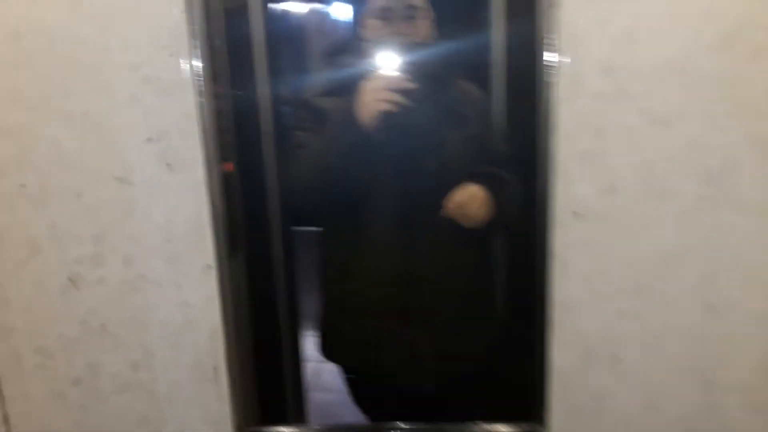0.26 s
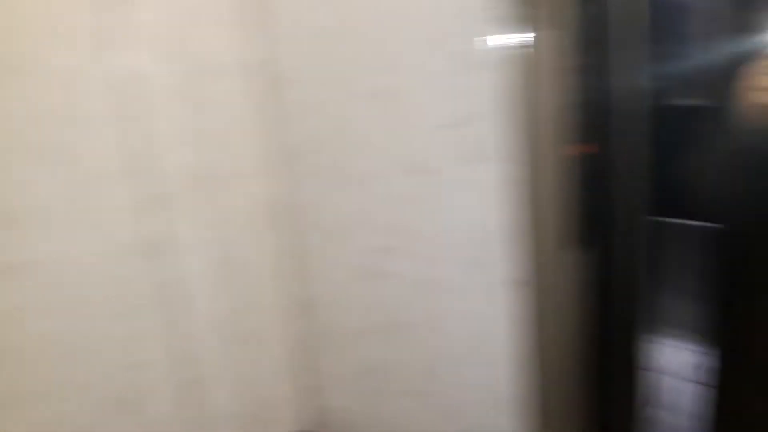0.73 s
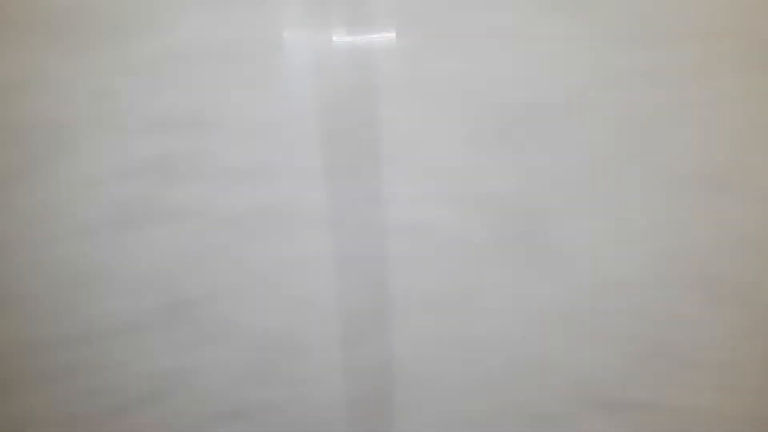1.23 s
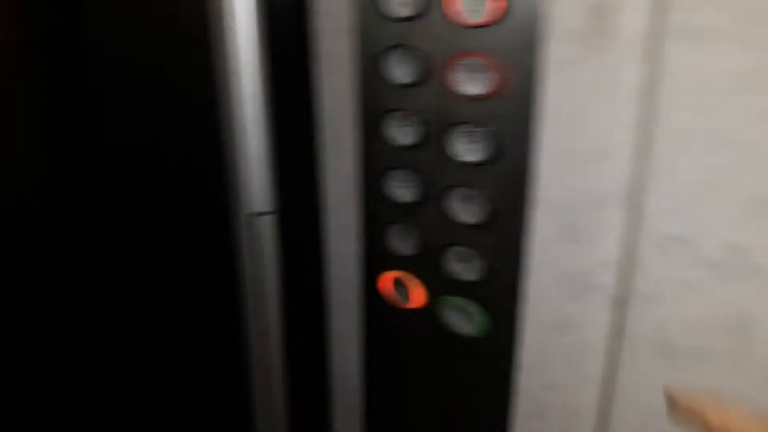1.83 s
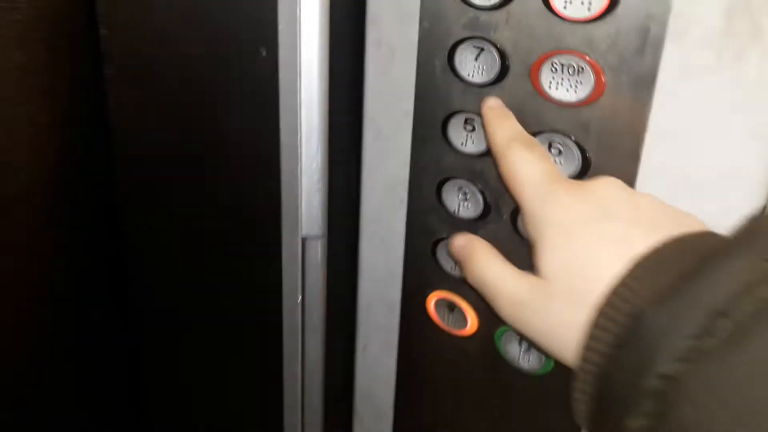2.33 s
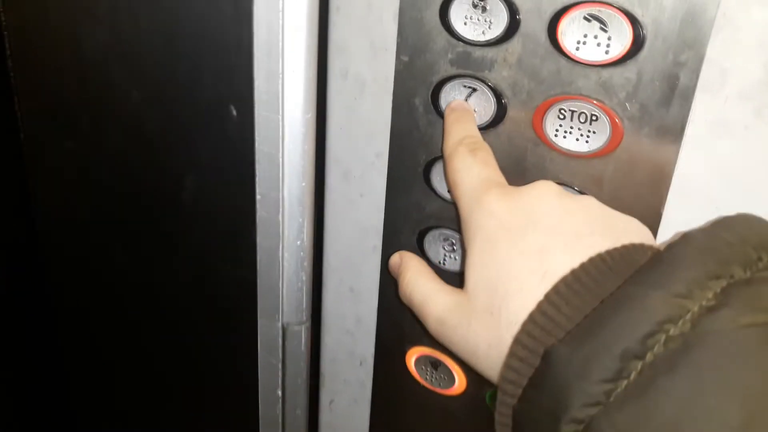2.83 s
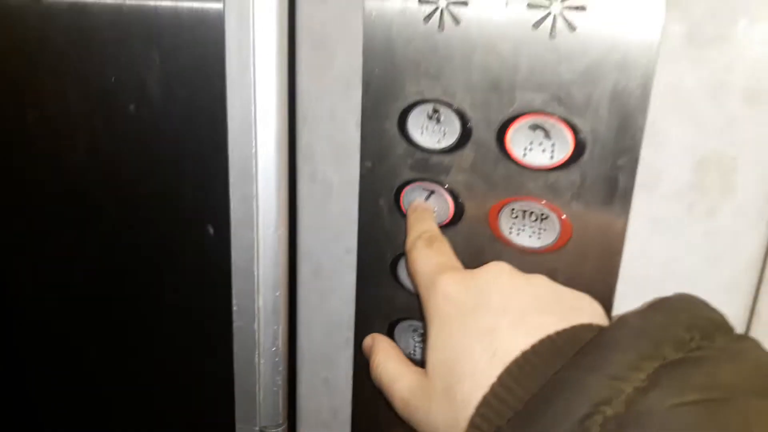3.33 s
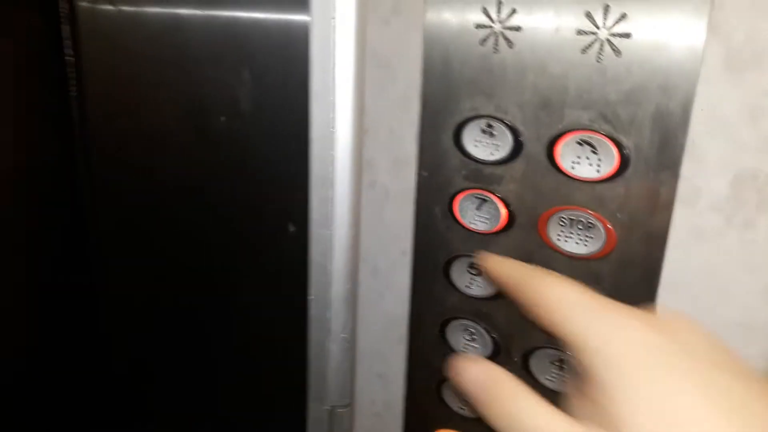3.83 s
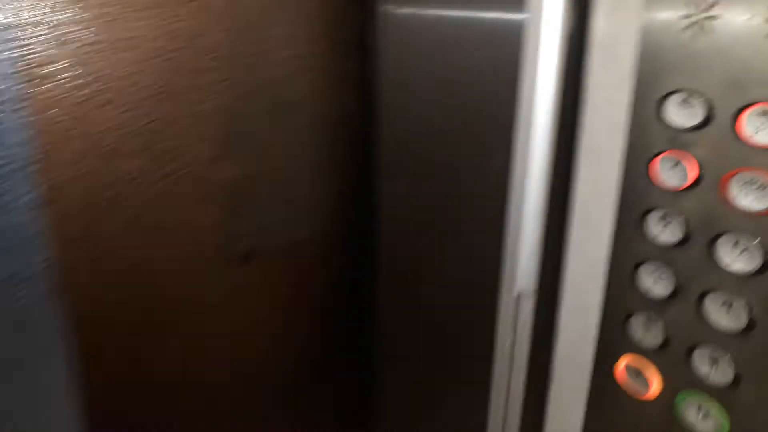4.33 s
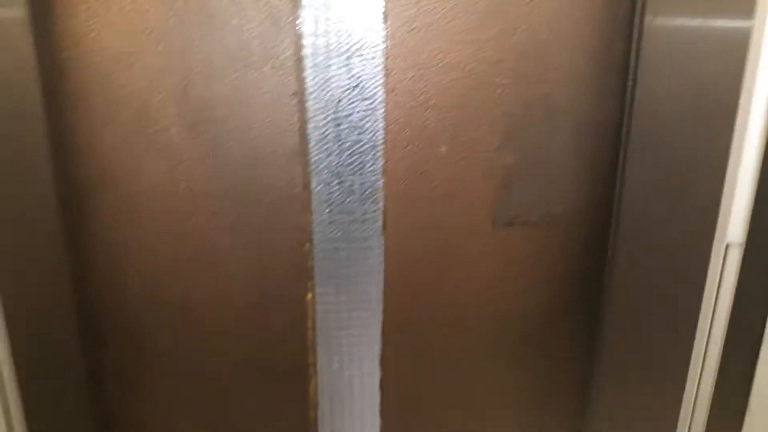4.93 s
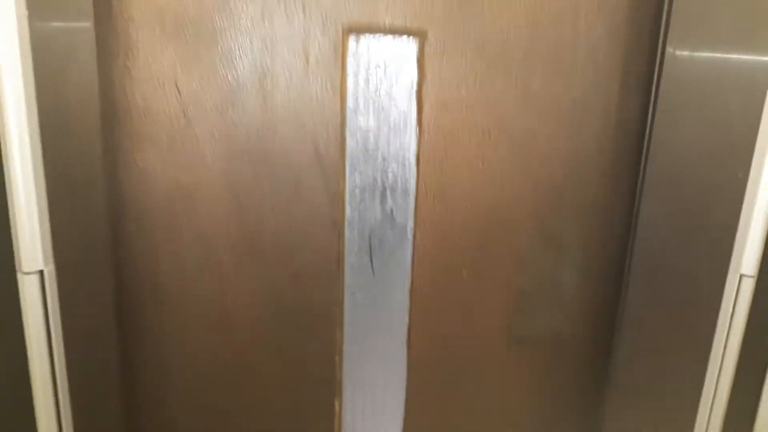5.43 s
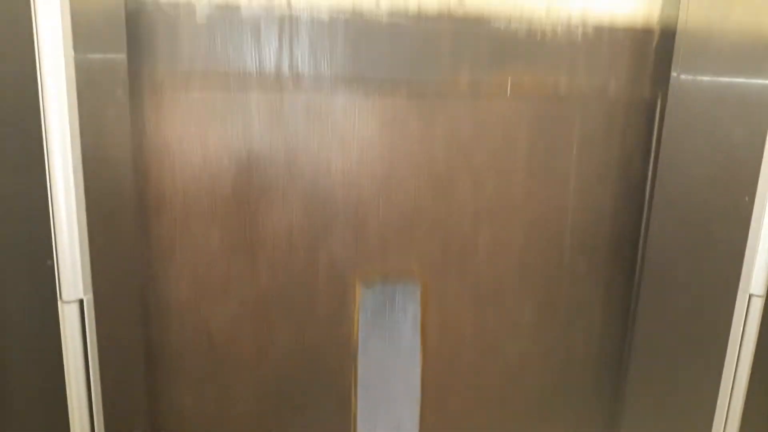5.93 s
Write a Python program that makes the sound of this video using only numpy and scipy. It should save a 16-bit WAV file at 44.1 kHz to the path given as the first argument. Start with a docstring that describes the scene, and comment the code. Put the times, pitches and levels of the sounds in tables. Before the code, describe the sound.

A close handheld mono microphone inside a small, boxy steel lift. For the first 1.4 seconds there is only quiet: soft coat rustle, muffled foot shifts on a hollow floor, and light taps near 0.3 and 0.7. From 1.4 to 2.3 a loose steel door bangs and rattles in its frame, an uneven cluster of hard knocks, strongest around 1.5 to 1.8, with another group near 1.95 and weaker thuds after, ringing briefly. The ring dies into near silence. Around 2.9 to 3.2 a fingertip creaks in tiny ticks; a faint springy click comes at 3.35, a sharper, louder snap at 3.65, and a dry tick at 4.06. At 4.44 to 4.56 the sliding doors meet with a metallic clash and a deep, round boom that decays. From 4.9 to the end near 6 a faint low rumble and wavering motor hum run under small sleeve rustles.

```python
'''Inside a small lift: the steel landing door bangs and rattles in its frame, then a floor button clicks.
The sliding car doors meet with a clash and a boom, and the drive hums. A coat rustles, feet shift.
Struck steel is enveloped noise bands plus ringing modes; booms are swelling sines; fittings and the
button spring are clusters of close modes. Coat, floor, air and ride are coloured noise; hum is wavering sines.'''
import sys
import numpy as np
from scipy import signal
from scipy.fft import rfft, irfft
from scipy.io import wavfile

SR = 44100
rng = np.random.default_rng(int(sys.argv[2]) if len(sys.argv) > 2 else 0)


def dump_mix(stems):
    """Bounce the given channels to the path in sys.argv[1] as a 16-bit WAV at rate SR."""
    frames = np.atleast_2d(stems).T  # one column per channel
    limited = np.clip(frames, -1, 1)  # hard clip at full scale
    pcm = np.round(limited * 32767).astype(np.int16)
    wavfile.write(sys.argv[1], SR, pcm)


N = 272487
TIME_S = np.arange(N) / SR

# door blows: (time [s], relative level [dB], tilt [dB/octave], rise [s])
DOOR_BLOWS = [(1.42, -18.5, -5, 0.009), (1.497, -17.5, -4, 0.002), (1.514, -10, -2.35, 0.0023),
              (1.519, -11, -1.7, 0.00092), (1.562, -13.5, -2.5, 0.0066), (1.618, -10, -4, 0.00086),
              (1.715, -13.5, -5, 0.028), (1.773, -12.5, -5.5, 0.012), (1.789, -13.5, -4.5, .01),
              (1.921, -31, 0.5, 0.0087), (1.934, -22.5, -0.45, 0.0063), (1.955, -13, -4, 0.0047),
              (1.973, -12.5, -5.5, 0.0017), (2.139, -16.5, -5, 0.0069), (2.213, -20.5, -8.5, 0.036),
              (2.274, -28.5, -6, .003), (4.422, -23.5, -2, .012), (4.44, -13, -4.5, 0.0018),
              (4.48, -17, -0.9, 0.0031), (4.488, -15.5, 0.5, .0017), (4.555, -14, -2.5, 0.00078)]
# ring of the doors and the car: (frequency [Hz], relative level [dB], T60 [s])
RING_MODES = [(89.2, -17, 0.85), (128.5, -19, 1), (180, -16.5, 0.81), (199, -14, 0.77), (258.7, -9.5, 0.54),
              (344.6, -12, 0.67), (434, -15, 0.67), (489, -16.5, 0.6), (584, -12, 0.2), (786, -36, 0.28),
              (853, -21, 0.41), (957, -24, 0.19), (1190, -26, 0.22), (1420, -22, 0.33), (1467, -20, 0.19),
              (1620, -14.5, 0.25), (2900, -30.5, 0.2), (3130, -30, 0.23), (4490, -39, .25),
              (4840, -28, 0.22)]
# dense ring of sheet steel: (frequency [Hz], relative density [dB])
STEEL_COLOUR = [(40, -53), (85, -6.5), (130, -13), (260, 1.5), (450, -5), (700, -10.5), (1300, -9.5),
                (2100, -10.5), (3100, -9), (5000, -7.5), (6700, -14), (8400, -5), (10000, -23.5),
                (13000, -11.5), (16000, -12)]
DOOR_CLANG_DB = 4.5


def doors(bands, clatter_db=12.0, modes_db=-4.0, rattle_db=2.0):
    """Loose steel clatters at each blow, and the strongest modes ring on."""
    clatter = strikes(DOOR_BLOWS, bands, STEEL_COLOUR, tail_db=-5.5, stretch=1.0, clang_db=DOOR_CLANG_DB)
    out = from_db(clatter_db + rattle_db * drift(320)) * clatter
    start_s, blow_db, tilt, _ = np.transpose(DOOR_BLOWS)
    delay_cycles = rng.random((len(start_s), len(RING_MODES)))  # each mode answers within one cycle
    signs = rng.choice([-1, 1], delay_cycles.shape)
    for (hz, mode_db, t60_s), delay, sign in zip(RING_MODES, delay_cycles.T, signs.T):
        level_db = contact_db(hz, blow_db, tilt, DOOR_CLANG_DB) + mode_db + modes_db
        clicks = np.zeros(N)
        clicks[((start_s + delay / hz) * SR).astype(int)] = sign * from_db(level_db)
        out += ring(clicks, hz, t60_s)
    return out


# first clatter: (frequency [Hz], T60 at stretch 1 [s])
CLATTER_DECAY = [(100, 0.18), (400, 0.23), (1500, 0.19), (5000, 0.14), (14000, 0.14)]
# tail in the car: (frequency [Hz], T60 [s])
TAIL_DECAY = [(100, 1), (400, 0.56), (1500, 0.36), (5000, 0.36), (14000, 0.34)]


def strikes(table, bands, colour, tail_db, stretch, clang_db):
    """Each strike builds up in countless modes, dies fast and leaves a tail in the car."""
    out = np.zeros(N)
    t = TIME_S[:SR]
    rises = [(1 - np.exp(-t / rise_s)) ** 2 for *_, rise_s in table]
    for hz, noise in bands:
        clatter = from_db(-60 * t / (stretch * at_hz(CLATTER_DECAY, hz)))
        tail = from_db(tail_db - 60 * t / at_hz(TAIL_DECAY, hz))
        decay = clatter + tail
        power = np.zeros(N + SR)
        for (start_s, db, tilt, _), rise in zip(table, rises):
            gain = from_db(contact_db(hz, db, tilt, clang_db))
            add(power, start_s, rise * (gain * decay) ** 2)
        out += from_db(at_hz(colour, hz)) * np.sqrt(power[:N]) * noise
    return out


PIVOT_HZ, CLANG_HZ, TILT_TOP_HZ = 350, 1030, 5860


def contact_db(hz, db, tilt, clang_db):
    """Strike strength at a frequency: hard contact tilts it to the treble, a clang lifts the middle."""
    octaves = np.log2(np.clip(hz, PIVOT_HZ, TILT_TOP_HZ) / PIVOT_HZ)
    clang = at_hz([(PIVOT_HZ, 0), (CLANG_HZ, clang_db), (TILT_TOP_HZ, 0)], hz)
    return db + tilt * octaves + clang


# latch and loose fittings: (time [s], pitch [Hz], level before rise and decay [dB])
FITTING_KNOCKS = [(1.519, 3054, -16.5), (1.520, 979, -19), (1.619, 854, -12), (1.945, 3266, -24.5),
                  (2.141, 2414, -33), (2.145, 1303, -24.5), (4.442, 776, -19), (4.556, 2140, -20),
                  (4.576, 2500, -28)]


def knocks(t60_s=0.14, spread=0.12, rise_s=0.0029):
    """Each small fitting is shaken into ringing around a pitch of its own."""
    out = np.zeros(N)
    for start_s, hz, db in FITTING_KNOCKS:
        ringing = cluster(hz, t60_s, spread, count=9)
        rise = 1 - np.exp(-TIME_S[:len(ringing)] / rise_s)
        add(out, start_s, from_db(db) * ringing * rise)
    return out


# door and floor panels flexing: (time [s], pitch [Hz], envelope peak [dB], swell [s])
PANEL_BOOMS = [(0.347, 206, -37, 0.058), (1.523, 455, -11, 0.0065), (1.640, 353, -20, 0.037),
               (1.785, 333, -18.5, 0.033), (1.963, 233.3, -16.5, 0.011), (2.153, 211, -21, 0.014),
               (2.155, 131, -24, 0.046), (4.560, 258, -1.5, 0.0097), (4.603, 244, -13, 0.011),
               (4.641, 336, -31, 0.018)]


def booms():
    """A panel swells into a few strong cycles and is damped by its frame."""
    out = np.zeros(N)
    for start_s, hz, db, swell_s in PANEL_BOOMS:
        t = np.maximum(TIME_S - start_s, 0)
        swell = (t / swell_s * np.exp(1 - t / swell_s)) ** 2
        out += from_db(db) * swell * np.sin(2 * np.pi * hz * t)
    return out


# button clicks and small taps: (time [s], relative level [dB], tilt [dB/octave])
TAP_EVENTS = [(0.334, -29.5, -2), (0.693, -30.5, -0.45), (1.144, -48, 3), (2.871, -44.5, -1.5),
              (3.088, -39.5, -2.5), (3.354, -48, 0.5), (3.429, -41.5, -1), (3.644, -33.5, -1.5),
              (3.649, -31.5, 3.5)]
# colour of a tap: (frequency [Hz], relative density [dB])
TAP_SPECTRUM = [(40, -21.5), (100, -18.5), (220, 1), (450, -1), (800, -14), (1800, -8), (2600, -14),
                (4200, -8), (6700, -17), (8500, -3.5), (10000, -31.5), (13000, -48), (16000, 0)]
# dry snaps close by: (time [s], peak level [dB])
DRY_SNAPS = [(3.3555, -29), (3.652, -11), (4.058, -18)]
# spring of the pressed button: (frequency [Hz], level before decay [dB], T60 [s])
SPRING_MODES = [(4460, -45, 0.1), (7900, -55, 0.12), (8700, -43, 0.1), (11900, -52, .13), (14600, -45, .12)]
PRESS_S, TAP_RISE_S = 3.3555, 0.00023


def buttons(bands, taps_db=13, snap_decay_s=0.0018, spring_spread=0.0195):
    """Taps ring in the car, close snaps sound dry, and the button's spring pings."""
    taps = [(start_s, db, tilt, TAP_RISE_S) for start_s, db, tilt in TAP_EVENTS]
    out = from_db(taps_db) * strikes(taps, bands, TAP_SPECTRUM, tail_db=-31.5, stretch=1.08, clang_db=2)
    t = TIME_S[:SR // 100]
    for start_s, db in DRY_SNAPS:
        snap = rng.standard_normal(len(t)) * np.exp(-t / snap_decay_s)
        add(out, start_s, from_db(db) * snap / np.abs(snap).max())
    for hz, db, t60_s in SPRING_MODES:
        add(out, PRESS_S, from_db(db) * cluster(hz, t60_s, spring_spread))
    return out


# fingertip creaking on the button: (time [s], mean tick rate [1/s], relative level [dB])
FINGER_CREAK = [(2.86, 30, -38), (2.98, 40, -43), (3.0, 260, -31), (3.1, 200, -41), (3.16, 40, -45)]


def fingertip(edge_hz=4000):
    """Skin sticks and slips on the button in tiny uneven ticks."""
    point_s, rate, db = np.transpose(FINGER_CREAK)
    slips = rng.random(N) < np.interp(TIME_S, point_s, rate, left=0, right=0) / SR
    force = slips * from_db(np.interp(TIME_S, point_s, db)) * rng.uniform(0.88, 1, N)
    envelope = signal.lfilter([1], [1, -0.93], force + 1e-18)
    grit = envelope * rng.standard_normal(N)
    return signal.sosfilt(signal.butter(2, edge_hz, "high", fs=SR, output="sos"), grit)


# sleeve strokes: (middle [s], half length [s], peak level [dB])
SLEEVE_STROKES = [(0.226, 0.51, -41.5), (0.602, .12, -39.5), (0.942, 0.11, -42.5), (1.3, 0.41, -45.5),
                  (2.092, 0.46, -41.5), (3.046, 0.12, -55), (3.304, 0.048, -53), (3.466, 0.074, -48),
                  (3.897, 0.31, -43), (4.35, 1, -47), (4.886, 0.069, -41.5), (5.012, 0.057, -47.5),
                  (5.33, 0.41, -52.5), (5.602, 0.21, -47.5), (6.18, 0.12, -43.5)]
# fabric hiss: (frequency [Hz], relative density [dB])
COAT_COLOUR = [(290, -4.5), (500, -4), (820, -2), (1400, -5.5), (2000, -3), (2800, -6.5), (4500, -2.5),
               (6700, -8), (8500, -2), (9800, -15.5), (12500, -10), (14600, -9.5), (16000, -20.5)]


def coat(grain_db=0.5, stroke_shape=2.3):
    """Smooth fabric hisses as its threads slip; the arm speeds up and slows down in each stroke."""
    power = np.zeros(N)
    for middle_s, half_length_s, db in SLEEVE_STROKES:
        # shape 2 is a round swell, more is a stroke at even speed
        offset = np.abs((TIME_S - middle_s) / half_length_s) ** stroke_shape
        speed = np.exp(-np.minimum(offset, 20))
        power += (from_db(db) * speed) ** 2
    slips = rng.standard_normal(N) * from_db(grain_db * drift(78))
    return np.sqrt(power) * coloured(slips, COAT_COLOUR)


# feet shifting: (time [s], peak level [dB])
FOOT_STEPS = [(0.0, -40.5), (0.309, -37), (0.701, -35), (0.908, -33.5), (1.24, -42.5), (2.76, -50.5),
              (3.06, -50), (3.4, -51), (4.16, -41.5), (4.86, -40)]
# hollow floor: (frequency [Hz], relative density [dB])
FLOOR_SPECTRUM = [(25, -27.5), (50, 1.5), (68, -12), (92, 5.5), (160, -8), (220, -4), (310, -11),
                  (450, -9.5), (700, -17.5), (1500, -26.5), (3000, -48), (16000, -82.5)]
# still air of the shaft: (frequency [Hz], relative density [dB])
AIR_COLOUR = [(24, -38.5), (40, 17.5), (133, 2), (151, 5.5), (680, -22), (770, -19.5), (1900, -23),
              (3650, -13.5), (3930, -15.5), (16000, -26.5)]


def car_floor(lumpy_db=2.0, swell_s=0.036, t60_s=1, air_rms_db=-52.5):
    """The hollow floor rumbles under each step, over the still air of the shaft."""
    lumpy = rng.standard_normal(N) * from_db(lumpy_db * drift(5))
    rumble = coloured(lumpy, FLOOR_SPECTRUM)
    power = np.zeros(N)
    for start_s, db in FOOT_STEPS:
        swell = np.clip((TIME_S - start_s) / swell_s, 0, 1)
        decay_db = -60 * np.maximum(TIME_S - start_s - swell_s, 0) / t60_s
        power += (swell * from_db(db + decay_db)) ** 2
    air = coloured(rng.standard_normal(N), AIR_COLOUR)
    return np.sqrt(power) * rumble + from_db(air_rms_db) * air


# rumble of the moving car: (frequency [Hz], relative density [dB])
RIDE_COLOUR = [(30, 7), (45, -1), (70, -2), (110, -3), (160, -23), (220, -2), (320, -4.5), (550, -13),
               (1000, -21.5), (2000, -16), (2700, -45), (4200, -52), (6500, -31), (8200, -25), (10000, -62),
               (12500, -27), (16000, -53)]
# drive hum: (frequency [Hz], mean rms level [dB], rms pitch wander [Hz])
HUM_LINES = [(105.4, -55, 10.22), (180, -67.5, 8), (282, -62, 4.8), (400, -53.5, 1.46)]


def drive(ride_rms_db=-52.5, waver_db=0.5, start_s=4.9, fade_s=0.15):
    """The car rumbles and the motor hums once the doors are shut, each line wavering a little."""
    out = from_db(ride_rms_db) * coloured(rng.standard_normal(N), RIDE_COLOUR)
    for hz, db, wander_hz in HUM_LINES:
        phase = 2 * np.pi * np.cumsum(hz + wander_hz * drift(8.5)) / SR
        out += np.sqrt(2) * from_db(db + waver_db * drift(7.2)) * np.sin(phase)
    return out * np.clip((TIME_S - start_s) / fade_s, 0, 1)


def noise_bands():
    """About third-octave noise bands as (centre Hz, samples), neighbours unrelated."""
    edges_hz = np.geomspace(40, 16500, 27)
    white = rng.standard_normal((2, N))
    bands = []
    for k, (low, high) in enumerate(zip(edges_hz, edges_hz[1:])):
        band_pass = signal.butter(2, [low, high], "band", fs=SR, output="sos")
        bands.append((np.sqrt(low * high), signal.sosfilt(band_pass, white[k % 2])))
    return bands


def ring(clicks, hz, t60_s):
    """A unit click sets a decaying sine of starting height 1 ringing in a two-pole resonator."""
    radius = from_db(-60 / (t60_s * SR))
    angle = 2 * np.pi * hz / SR
    feedback = [1, -2 * radius * np.cos(angle), radius * radius]
    return signal.lfilter([0, np.sin(angle)], feedback, clicks + 1e-18)


def cluster(hz, t60_s, spread, count=6):
    """Close modes beat as they die away together; rms 1 before the decay."""
    t = TIME_S[:SR // 2]
    jitter = rng.uniform(-1.3, 1, count) / count
    pitches_hz = hz * (1 + spread * (np.linspace(-1, 1, count) + jitter))
    start_cycles = rng.random((count, 1))
    modes = np.sin(2 * np.pi * (pitches_hz[:, None] * t + start_cycles)).sum(axis=0)
    return from_db(-60 * t / t60_s) * rms_one(modes)


def coloured(x, spectrum):
    """Shape a steady sound to a spectrum, with a bass cut around 30 Hz; rms 1."""
    hz = np.maximum(np.fft.rfftfreq(N, 1 / SR), 1)
    bass_cut = hz ** 2 / (hz ** 2 + 900)
    return rms_one(irfft(rfft(x) * from_db(at_hz(spectrum, hz)) * bass_cut, N))


def drift(rate_hz):
    """Smooth random variation of rms 1: low-passed noise made at SR / 40."""
    pole = np.exp(-2 * np.pi * rate_hz * 40 / SR)
    white = rng.standard_normal(N // 40 + 2002)
    slow = signal.lfilter([1], [1, -2 * pole, pole * pole], white)[2000:]  # drop the settling
    return np.interp(np.arange(N) / 40, np.arange(len(slow)), rms_one(slow))


def at_hz(points, hz):
    """Read a table on a log-frequency axis."""
    point_hz, value = np.transpose(points)
    return np.interp(np.log(hz), np.log(point_hz), value)


def from_db(db):
    """Decibels to gain."""
    return 10 ** (np.asarray(db) / 20)


def rms_one(x):
    """Scale to rms 1."""
    return x / np.sqrt(np.mean(x ** 2) + 1e-20)


def add(out, start_s, sound):
    """Mix a short sound in at a time."""
    start = int(start_s * SR)
    out[start:start + len(sound)] += sound


def scene():
    """Sum of all sources, one channel."""
    bands = noise_bands()
    steel = doors(bands) + knocks() + booms()
    button = buttons(bands) + fingertip()
    return (steel + button + coat() + car_floor() + drive())[None]


def record(dry, bass_hz=38, ceiling=1.1, cutoff_hz=15850):
    """The microphone loses the deepest bass, peaks are rounded, the top is cut."""
    thin = signal.sosfilt(signal.butter(2, bass_hz, "high", fs=SR, output="sos"), dry)
    rounded = ceiling * np.tanh(thin / ceiling)
    return signal.sosfilt(signal.ellip(12, 0.1, 90, cutoff_hz, fs=SR, output="sos"), rounded)


dry = scene()
out = record(dry)
dump_mix(out)
```